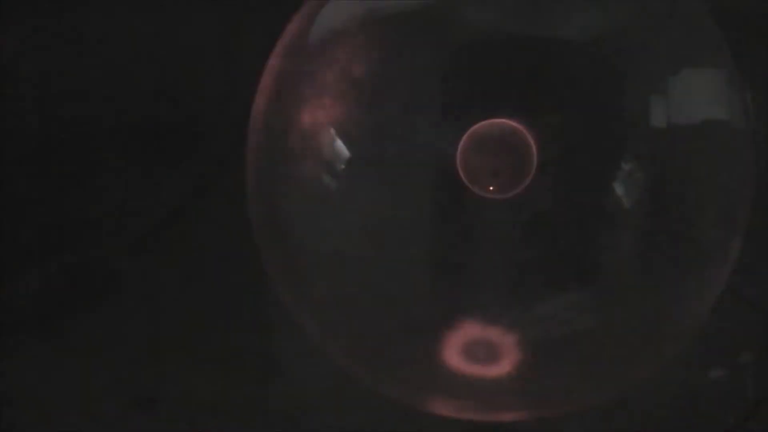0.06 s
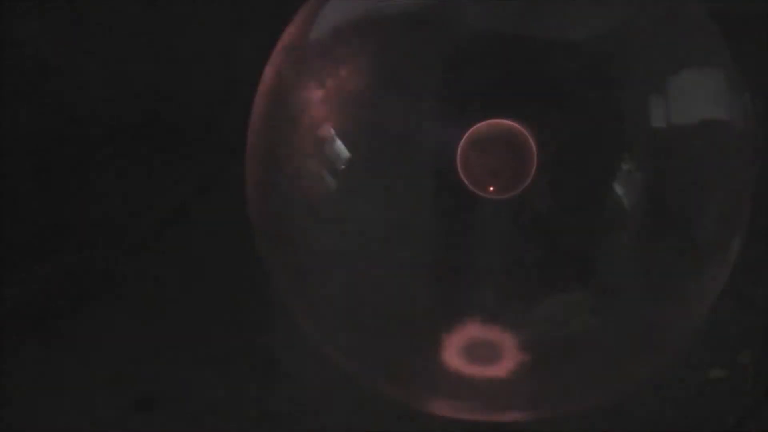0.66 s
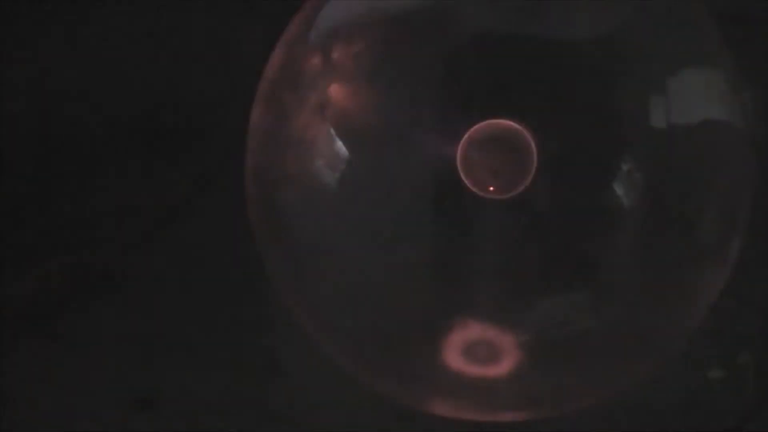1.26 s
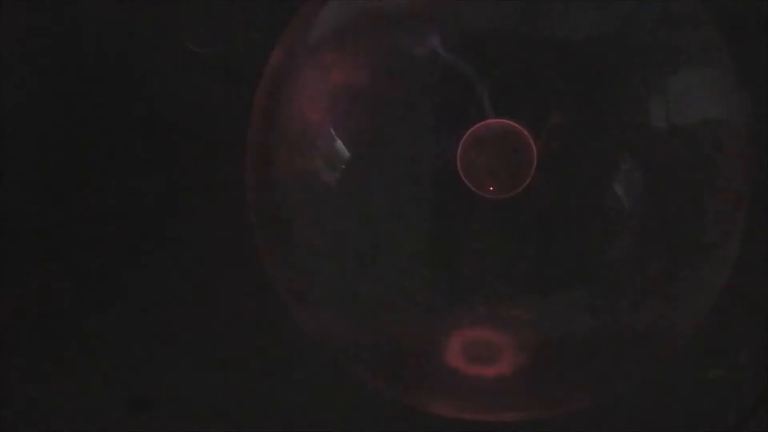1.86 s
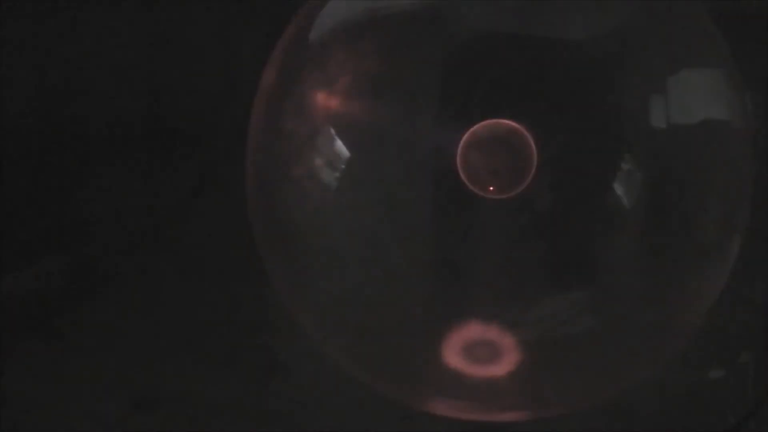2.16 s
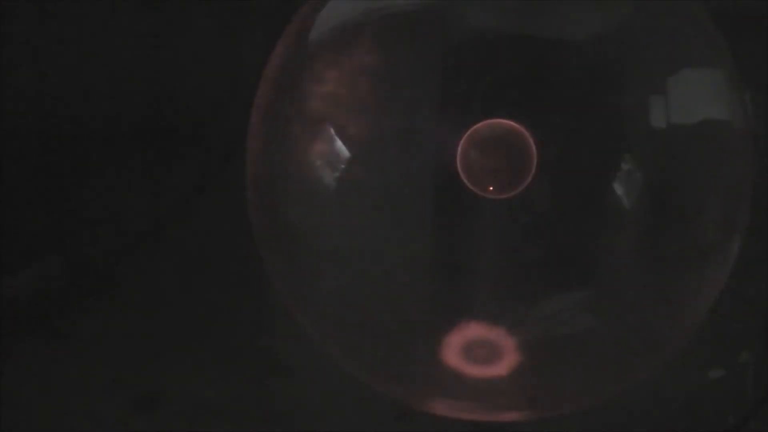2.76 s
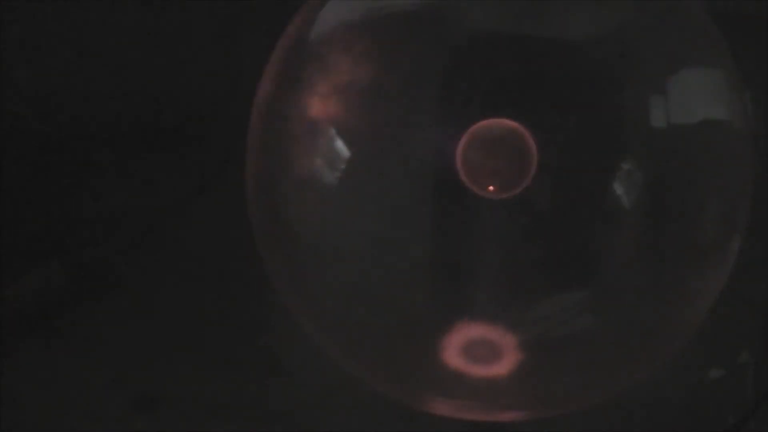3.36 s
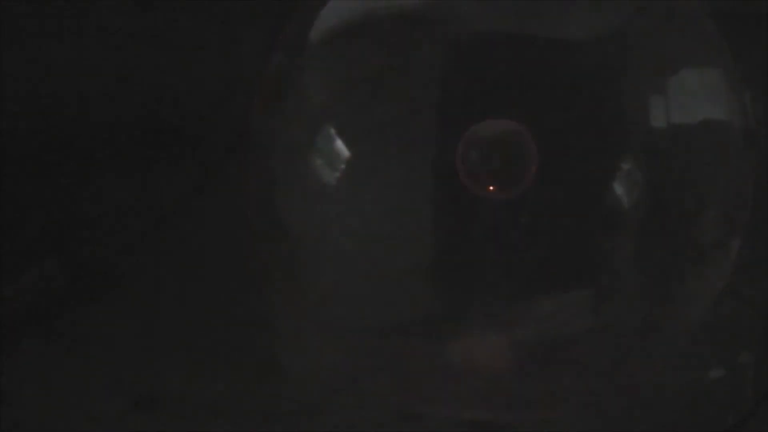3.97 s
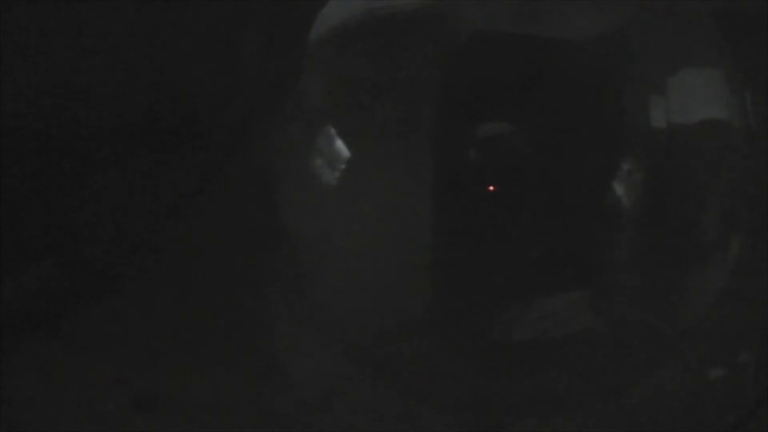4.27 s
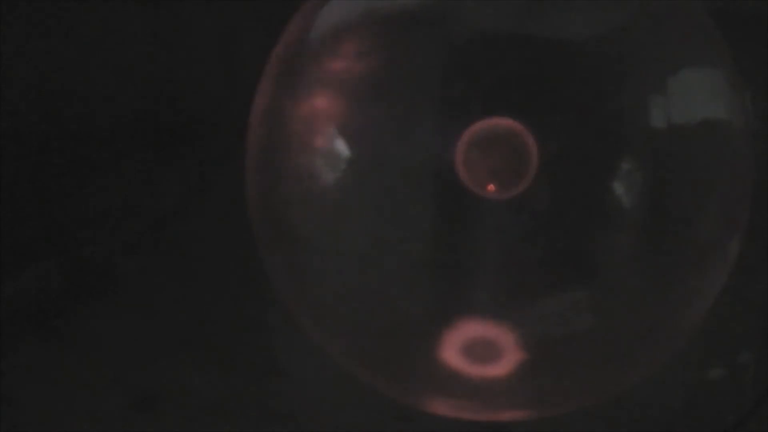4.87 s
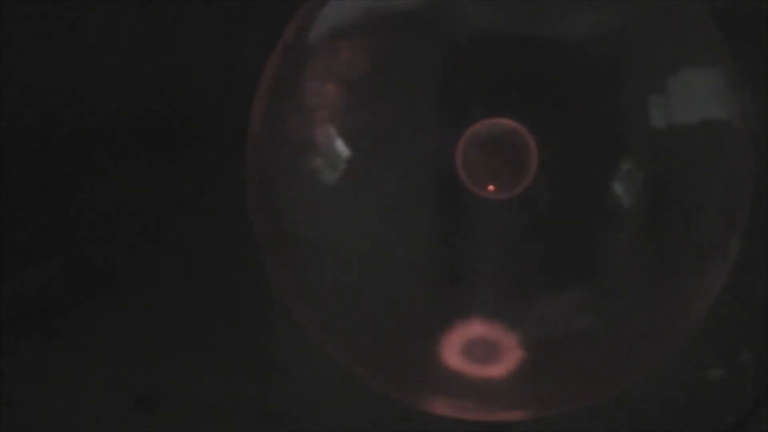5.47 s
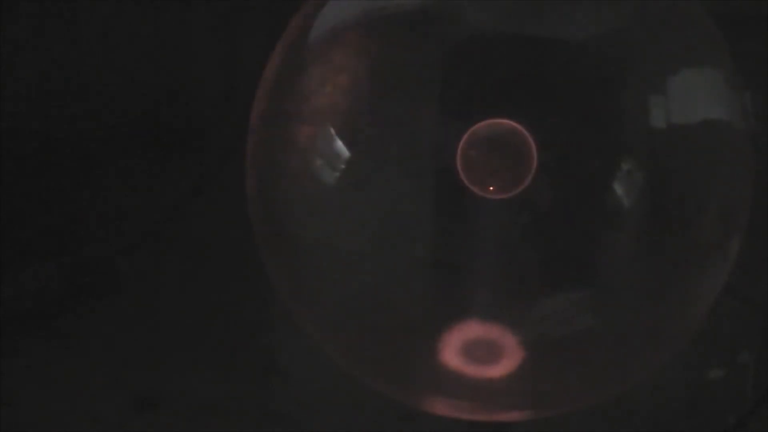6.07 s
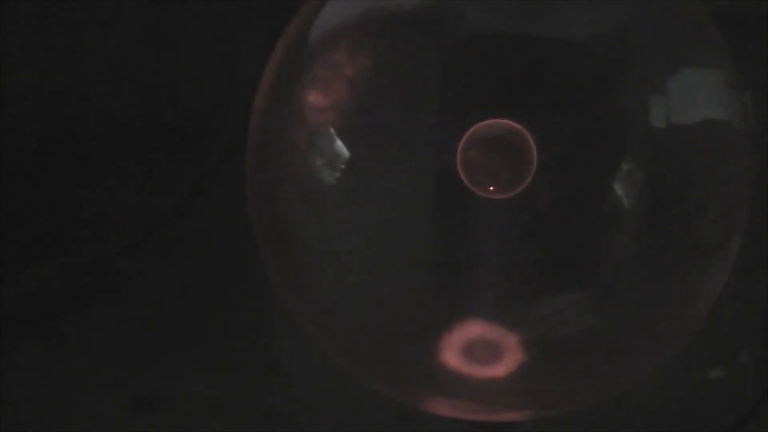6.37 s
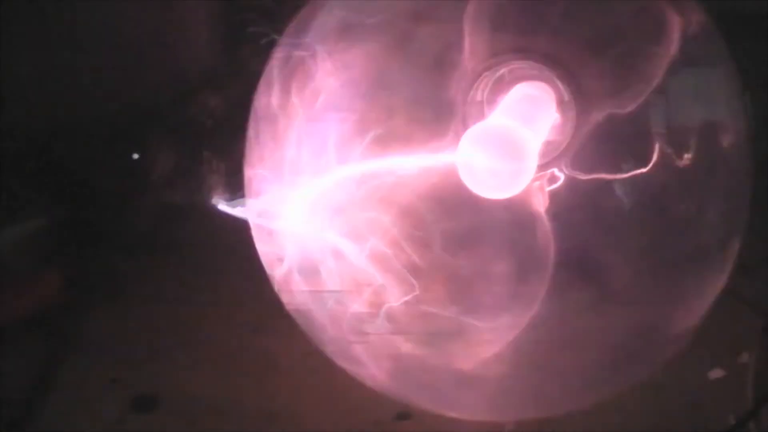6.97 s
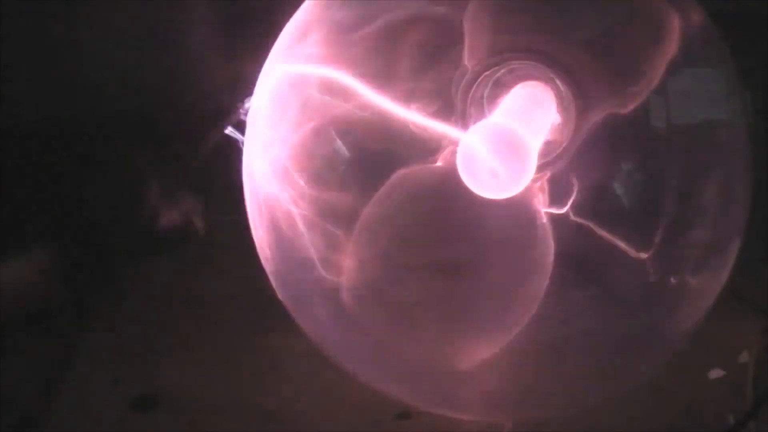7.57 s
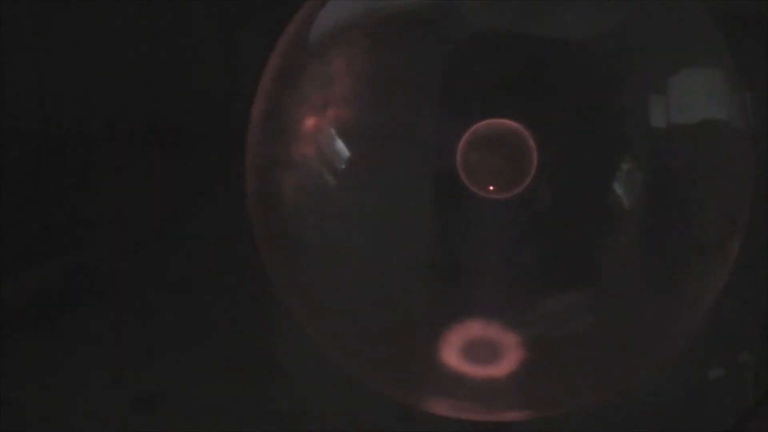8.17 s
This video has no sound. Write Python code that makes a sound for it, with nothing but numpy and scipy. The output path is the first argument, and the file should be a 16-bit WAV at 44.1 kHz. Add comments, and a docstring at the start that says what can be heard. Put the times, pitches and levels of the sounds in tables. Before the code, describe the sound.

A high-voltage coil runs in a small workshop, making a buzzy, sizzling hiss over a faint transformer hum and rattle. The tail of an arc dies away at the very start. Sharp sparks snap in quick runs, each catching into a loud, harsh buzzing arc, at about 0.5, 1.0 and 1.7 seconds. The arcs last a fifth to a third of a second and put low thumps into the microphone. From 2 seconds the quieter hiss creeps back and holds. At 4 seconds the power cuts, leaving faint room rumble. At 4.5 the hiss and hum return stronger, with a couple of clicks, then settle, and the rattle fades around 5.5. Sparks snap again at 7 and 7.6 seconds, each run leading into another loud, thumping arc with a hissing tail. The background ducks after each arc, and the hiss continues until about 8 seconds.

```python
"""High-voltage coil in a small workshop

A coil on 60 Hz mains sprays hissing corona each half cycle, while its transformer hums and rattles.
Sparks snap across the gap, once a cycle, until a loud buzzing arc catches; its surges cause thumps of
electrical interference in the microphone. The supply is cut for half a second and returns with an
overshoot. The camera's gain control ducks at each arc and creeps back."""
import sys
import numpy as np
from scipy import signal
from scipy.fft import rfft, irfft, next_fast_len
from scipy.io import wavfile
from scipy.ndimage import map_coordinates

SR = 44100
rng = np.random.default_rng(int(sys.argv[2]) if len(sys.argv) > 2 else 0)


def dump(signal):
    """Clip the signal to [-1, 1] and save it as 16-bit WAV at the path in sys.argv[1]."""
    limited = np.clip(np.atleast_2d(signal).T, -1, 1)
    pcm = np.round(limited * 32767).astype(np.int16)
    wavfile.write(sys.argv[1], SR, pcm)


N = 362061
LEAD = SR // 4  # the coil is already running before time zero
T = np.arange(-LEAD, N) / SR
MAINS_HZ, CREST_TURNS = 60.036, 0.555  # the current peaks at this point of the cycle
OFF_S, ON_S, ON_ATTACK_S = 4.024, 4.512, 0.031  # the supply is cut, then comes back
TOP_HZ = 16000

# Point of the mains cycle where the gas breaks down: time_s, phase_turns
FIRING = [(1, 0.5), (3.6, .57), (5.1, 0.526), (5.6, 0.48)]
# Held arcs, with sparking before the start and surging before the end; levels are relative:
# start_s, end_s, first_db, last_db, hiss_db, linger_s, sparking_s, surging_s, surge_db
ARCS = [(-.2, .007, 11, -4.5, -19.5, 0.021, 0, 0.022, -16),
        (0.474, 0.65, -10.5, -2, -14.5, 0.019, .046, 0.08, -6.5),
        (.99, 1.172, -9.5, -3.5, -15, 0.016, .115, 0.19, -16),
        (1.676, 1.985, -6, 3, -17.5, .027, .1, 0.29, -4.5),
        (7.087, 7.267, -8.5, -2, -13, .082, .033, .09, -11),
        (7.635, 7.804, -7, -11, -17, 0.063, .08, .1, -29)]


def amp(db):
    """Decibels to amplitude ratio."""
    return 10 ** (np.asarray(db) / 20)


def unit(x):
    """Scale to rms 1."""
    return x / np.sqrt(np.mean(x ** 2) + 1e-20)


def along(points, hz):
    """Interpolate (frequency, value) points on a logarithmic frequency axis."""
    freqs, values = np.transpose(points)
    return np.interp(np.log(hz + 1), np.log(freqs), values)


def curve(points):
    """Interpolate (time, value) points at every sample."""
    return np.interp(T, *np.transpose(points))


def wobble(rate_hz):
    """Smooth random modulation: a spline through Gaussian knots."""
    knots = rng.standard_normal(int(len(T) * rate_hz / SR) + 4)
    return map_coordinates(knots, [np.arange(len(T)) * rate_hz / SR])


def filtered(x, response):
    """Zero-phase filtering: multiply the spectrum by a frequency response."""
    n = x.shape[-1]
    padded = next_fast_len(n + SR // 4)
    return irfft(rfft(x, padded) * response(np.fft.rfftfreq(padded, 1 / SR)), padded)[..., :n]


def coloured(x, spectrum):
    """Spectral shaping, scaled to rms 1."""
    return unit(filtered(x, lambda hz: amp(along(spectrum, hz))))


def stereo(pair, side_db):
    """Left and right as sum and difference of a middle and a side signal."""
    side = amp(side_db) * pair[1]
    return np.array([pair[0] + side, pair[0] - side])


def noise(spectrum, side_db):
    """Coloured Gaussian noise, partly correlated between the channels."""
    return stereo(coloured(rng.standard_normal((2, len(T))), spectrum), side_db)


def add(track, time_s, sound):
    """Superpose a sound on a track."""
    i = LEAD + round(time_s * SR)
    track[..., i:i + sound.shape[-1]] += sound


def half_cycles(phase_turns):
    """Index of each mains half cycle, counted from a given phase, and seconds since it began."""
    count = 2 * (T * MAINS_HZ + round(MAINS_HZ) - phase_turns)
    return count.astype(int), count % 1 / (2 * MAINS_HZ)


def free_crests(start_s, end_s, events):
    """Current crests over a quarter cycle from every listed event, as (time_s, polarity 0 or 1)."""
    first, last = np.ceil(2 * (np.array([start_s, end_s]) * MAINS_HZ - CREST_TURNS)).astype(int)
    crests = [((k / 2 + CREST_TURNS) / MAINS_HZ, k % 2) for k in range(first, last)]
    taken_s = np.array(events)[:, 0]
    return [(s, polarity) for s, polarity in crests if np.abs(taken_s - s).min() > 0.25 / MAINS_HZ]


def inrush(hold_s=0.27, fade_s=0.3):
    """Switch-on transient: the share of the supply's overshoot, 0 to 1."""
    return np.interp(T, ON_S + np.cumsum([0, ON_ATTACK_S, hold_s, fade_s]), [0, 1, 1, 0])


def drive_db(overshoot_db=8):
    """Common excitation: corona, hum and rattle all follow how hard the coil is driven."""
    # Slow course of the drive: time_s, level_db
    course = [(0, -4), (.9, -0.5), (2.1, -1.5), (2.45, -3.5), (2.7, -2.5), (3.5, 1), (4.1, 0), (5.25, 0.5),
              (5.6, 2), (7, 2.5), (7.5, 6.5), (8, -0.5)]
    return curve(course) + overshoot_db * inrush()


def power(drain_db_per_s=254):
    """Supply gain: exponential decay when cut, a quick linear rise on return."""
    draining = amp(-drain_db_per_s * np.maximum(T - OFF_S, 0))
    return np.maximum(draining, np.clip((T - ON_S) / ON_ATTACK_S, 0, 1))


def background():
    """Ambient noise floor: a low broadband rumble with faint pure tones."""
    # Spectrum of the rumble: frequency_hz, relative_db
    spectrum = [(25, -42), (60, -3.5), (120, -1), (250, -5.5), (500, -8), (900, -9), (2000, -14.5),
                (6000, -24), (15000, -38)]
    # Steady room tones: pitch_hz, level_db
    tones = [(120, -70), (510, -72.5)]
    rumble = amp(-61) * noise(spectrum, side_db=-6)
    return rumble + sum(amp(db) * np.sqrt(2) * np.sin(2 * np.pi * hz * T) for hz, db in tones)


def transformer(restart_db=4.5, settle_s=5.35, settling_s=0.22, settle_db=12.5):
    """Forced vibration at mains harmonics: the core hums, and a loose part rattles until it settles."""
    # Partials of the core: mains_multiple, relative_db
    hum_partials = [(2, -5), (3, -19), (4, -4), (5, -35)]
    # Partials of the loose part: mains_multiple, relative_db
    rattle_partials = [(4, -6), (6, -4), (7, -8), (8, -6), (9, -15.5), (10, -12.5), (14, -17.5)]
    settled = np.clip((T - settle_s) / settling_s, 0, 1)
    hum_db = -55.5 + 0.96 * drive_db() + restart_db * (T > ON_S)
    rattle_db = -48.5 + 0.85 * drive_db() + 2 * inrush() - settle_db * settled
    phase = 2 * np.pi * (T * MAINS_HZ - curve(FIRING))
    hum = sum(amp(db) * np.sin(k * phase) for k, db in hum_partials)
    # cosines add in phase, bunching into a rasp at each firing
    rattle = sum(amp(db + 0.42 * wobble(16)) * np.cos(k * phase) for k, db in rattle_partials)
    return np.sqrt(2) * power() * (amp(hum_db + 0.41 * wobble(6.7)) * hum + amp(rattle_db) * rattle)


def corona(rise_s=0.00039, decay_s=0.0018, glow=0.2, scatter_db=1.4, weak_db=-3, grain_db=3):
    """Partial discharge: each half cycle throws a spray of tiny streamers that thins to a faint glow."""
    # Spectrum of the streamers: frequency_hz, relative_db
    spectrum = [(40, -44), (150, -19), (400, -15.5), (700, -19), (1280, -12.5), (1890, -8), (3100, -3.5),
                (4500, -3), (6200, -3), (8600, 1), (9250, -3), (9700, -2), (12000, -5), (16000, -13.5)]
    cycle, age_s = half_cycles(curve(FIRING))
    # the two polarities break down unequally, so every other spray is weaker
    size = amp(scatter_db * rng.standard_normal(cycle.max() + 1)[cycle] + weak_db * (cycle % 2))
    spray = glow + size * (1 - np.exp(-(age_s / rise_s) ** 2)) * np.exp(-age_s / decay_s)
    streamers = rng.standard_normal((2, len(T))) * amp(grain_db * wobble(5000))
    level_db = -31 + drive_db() + wobble(15) / 2
    return power() * amp(level_db) * stereo(coloured(streamers * spray, spectrum), side_db=-11)


def arcs(width_s=0.0013, burn=0.41, scatter_db=0.8, weak_db=-1, throb_db=-20):
    """Amplitude modulation: a held arc's roar flares at each current crest, and so it buzzes."""
    # Spectrum of the roar: frequency_hz, relative_db
    spectrum = [(60, -16), (150, -9.5), (700, -15), (1300, -9), (1900, -7), (3280, -0.5), (6200, -1),
                (8420, 2.5), (9250, 0), (9800, 0.5), (12000, -5), (16000, -10.5)]
    cycle, age_s = half_cycles(CREST_TURNS - 1 / 4)
    from_crest_s = age_s - 1 / (4 * MAINS_HZ)
    flare = unit(burn + np.exp(-0.5 * (from_crest_s / width_s) ** 2))
    current = np.zeros(len(T))
    for start, end, first_db, last_db, *_ in ARCS:
        size_db = np.interp(T, [start, end], [first_db, last_db]) + weak_db * (cycle % 2)
        size_db += scatter_db * rng.standard_normal(cycle.max() + 1)[cycle]
        current += (T > start) * (T < end) * amp(size_db) * flare
    roar = current * noise(spectrum, side_db=-8.5)
    # the hot channel swells and shrinks with the current: a low throb under the roar
    throb = filtered(current, lambda hz: (hz / 110) ** 4 / (1 + (hz / 140) ** 6))
    return roar + amp(throb_db) * throb


def arc_hiss(fade_s=0.036):
    """Broadband noise builds under each arc, lingers after it breaks, then decays exponentially."""
    # Spectrum of the hiss: frequency_hz, relative_db
    spectrum = [(200, -51), (1000, -20), (2300, -6), (3300, 0), (5200, 1.5), (8400, 0.5), (11000, -5),
                (16000, -18)]
    envelope = np.zeros(len(T))
    for start, end, _, _, hiss_db, linger_s, *_ in ARCS:
        decay = np.exp(-np.maximum(T - end - linger_s, 0) / fade_s)
        envelope += amp(hiss_db) * np.interp(T, [start, end], [0, 1]) * decay
    return envelope * noise(spectrum, side_db=-7)


def surges(click_s=0.00009, pulse_s=0.0002, swing_s=0.00125, jitter_s=0.0009, weak_db=-5):
    """Electrical interference thumps in the microphone: a click, a pulse and a slower opposite swing."""
    # Heavy single surges: time_s, level_db
    heavy = [(.4747, -8.5), (0.5007, -10), (0.6416, -1), (.9002, -8), (1.0073, -8.5), (1.0734, -5),
             (1.1245, -6), (1.1578, -7.5), (1.5334, -14), (1.583, -12.5), (1.675, -12.5), (1.908, 1),
             (1.9502, 1), (7.088, -6), (7.103, -11), (7.169, -6.5), (7.2046, -1.5), (7.2199, -3),
             (7.2446, -4), (7.2542, -4), (7.637, -3), (7.67, -8.5), (7.7385, -7.5), (7.7873, -8.5)]
    # once its channel is hot, an arc sputters near every crest until it breaks
    sputters = [(s + jitter_s * rng.standard_normal(),
                 surge_db + weak_db * polarity + 4.5 * rng.uniform(-1.1, 1))
                for _, end, *_, surging_s, surge_db in ARCS
                for s, polarity in free_crests(end - surging_s, end, heavy)]
    t = np.arange(SR // 25) / SR
    lobe = lambda tau: (t / tau) ** 2 * np.exp(-t / tau) / tau
    low_cut = signal.butter(2, 50, "high", fs=SR)
    track = np.zeros((2, len(T)))
    for time_s, level_db in heavy + sputters:
        length_s = pulse_s * np.exp(0.23 * rng.standard_normal())
        pulse = 0.14 * lobe(click_s) + lobe(length_s) - 2.1 * lobe(swing_s)
        thump = signal.lfilter(*low_cut, pulse)
        side = 1.36 * np.sign(rng.standard_normal()) * rng.uniform(0.47, 1.3)
        add(track, time_s, amp(level_db) * np.outer(stereo([1, side], 0), thump / thump.max()))
    return track


def sparks(growth_db_per_s=50, branch_delay_s=0.00167, fizz_db=-23, fizz_decay_s=0.0034):
    """Shock waves: one sharp front per spark, weaker ones from its farther branches, and a short fizz."""
    # Loud single sparks: time_s, level_db
    singles = [(0.351, 5.5), (0.383, 2.5), (.417, 0.5), (.4664, 2.5), (.9004, 4.5), (.9333, 8),
               (1.4335, 6.5), (1.4678, 5), (1.534, -1.5), (1.5666, 1), (4.5334, -9), (4.666, -2),
               (6.997, 6), (7.0147, 3.5), (7.0468, 9), (7.5805, 11), (7.612, 8), (7.629, 4), (7.637, 1)]
    # Spectrum of one shock: frequency_hz, relative_db
    spectrum = [(100, -12.5), (300, -9.5), (950, -6.5), (3600, 1), (6000, -0.5), (8400, -0.5),
                (11000, -5.5), (16000, -14)]
    # before an arc catches, the gap breaks once a mains cycle, harder as it warms
    run_up = [(s, 0.5 - growth_db_per_s * (start - s) + 1.5 * rng.standard_normal())
              for start, *_, sparking_s, _, _ in ARCS
              for s, polarity in free_crests(start - sparking_s, start, singles) if polarity]
    size = 1024
    hz, t = np.fft.rfftfreq(size, 1 / SR), np.arange(size) / SR
    onset_s = t[size // 8]
    shock = 1j * amp(along(spectrum, hz)) * (hz < TOP_HZ) * np.exp(-2j * np.pi * hz * onset_s)
    shock /= np.abs(signal.hilbert(irfft(shock))).max()
    fizz_envelope = amp(fizz_db) * np.exp(-t / fizz_decay_s)
    track = np.zeros((2, len(T)))
    for time_s, level_db in singles + run_up:
        delays_s = np.append(0, branch_delay_s * rng.uniform(0.13, 1, size=4))
        strengths = np.append(1, 0.63 * rng.uniform(0.067, 0.82, size=4))
        arrivals = strengths @ np.exp(-2j * np.pi * np.outer(delays_s, hz))
        fizz = stereo(rng.standard_normal((2, size)), side_db=-3.5) * fizz_envelope
        add(track, time_s - onset_s, amp(level_db) * irfft(shock * (arrivals + rfft(fizz))))
    return track


def rustle(start_s=4.435, ramp_s=0.023, hold_s=0.06):
    """A faint burst of shaped noise leads into the restart."""
    # Spectrum of the rustle: frequency_hz, relative_db
    spectrum = [(120, -34), (200, -9), (1310, -17), (1780, -7), (3010, -13), (3800, -14), (6300, -11.5),
                (15000, -34)]
    envelope = np.interp(T, start_s + np.cumsum([0, ramp_s, hold_s, ramp_s]), [0, 1, 1, 0])
    return amp(-53) * envelope * noise(spectrum, side_db=-6)


def workshop(sound, predelay=SR // 400, block=SR // 8):
    """Reverberation: the walls return a short, bright tail that changes as the discharge wanders."""
    # Reverberation time of the room: frequency_hz, t60_s
    decay_times = [(100, 0.17), (1000, 0.33), (4000, 0.36), (9000, 0.36), (16000, 0.24)]
    wet = np.zeros((2, len(T) + SR))
    for i in range(0, len(T), block):
        hz, t, bands = signal.stft(rng.standard_normal((2, SR // 3)), SR, nperseg=256)
        decay = amp(-60 * t / along(decay_times, hz)[:, None])
        tail = signal.istft(bands * decay, SR, nperseg=256)[1]
        tail = np.pad(tail, ((0, 0), (predelay, 0))) / np.linalg.norm(tail[0])
        middle = sound[:, i:i + block].mean(0)[None]
        add(wet, T[i], signal.fftconvolve(middle, stereo(tail, side_db=-5.5), axes=1))
    return wet[:, :len(T)]


def scene():
    """Superposition: the discharges and their reverberation, with the other sources heard dry."""
    discharge = corona() + amp(-3.5) * arcs() + arc_hiss() + sparks()
    mix = discharge + amp(-6) * workshop(discharge) + surges() + transformer() + background() + rustle()
    return mix[:, LEAD:]


def smoothed(x, time_constant_s):
    """First-order lag: a one-pole low-pass filter."""
    pole = np.exp(-1 / (time_constant_s * SR))
    return signal.lfilter([1 - pole], [1, -pole], x)


def gain_control(x, knee_db=-30, slope=0.66, attack_s=0.0088, recovery_db_per_s=32, start_db=-19):
    """Compression: the gain drops quickly at a loud sound and climbs back at a steady rate."""
    level_db = 10 * np.log10(smoothed(np.mean(x ** 2, axis=0), attack_s) + 1e-12)
    wanted_db = np.minimum(slope * (knee_db - level_db), 9)  # at most 9 dB of boost
    climb_db = recovery_db_per_s * np.arange(N) / SR
    gain_db = np.minimum(np.minimum.accumulate(wanted_db - climb_db), start_db) + climb_db
    # the gain element itself needs a moment to follow
    return x * amp(smoothed(gain_db - start_db, 0.00028) + start_db)


def record(dry, ceiling=0.6):
    """Soft saturation rounds off the peaks left by the camera's gain control; the band is then limited."""
    levelled = gain_control(dry)
    rounded = levelled / (1 + (levelled / ceiling) ** 4) ** (1 / 4)
    return filtered(rounded, lambda hz: hz < TOP_HZ)


dry = scene()
out = record(dry)
dump(out)
```